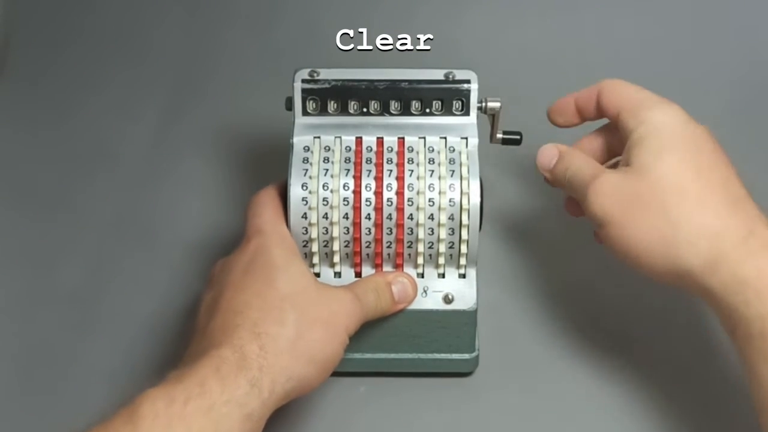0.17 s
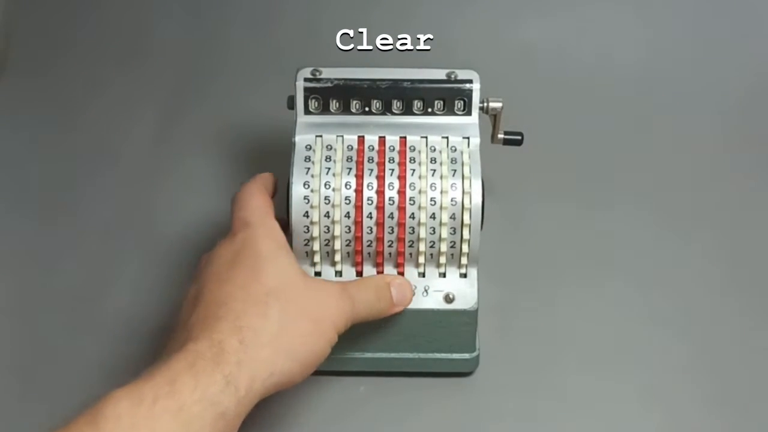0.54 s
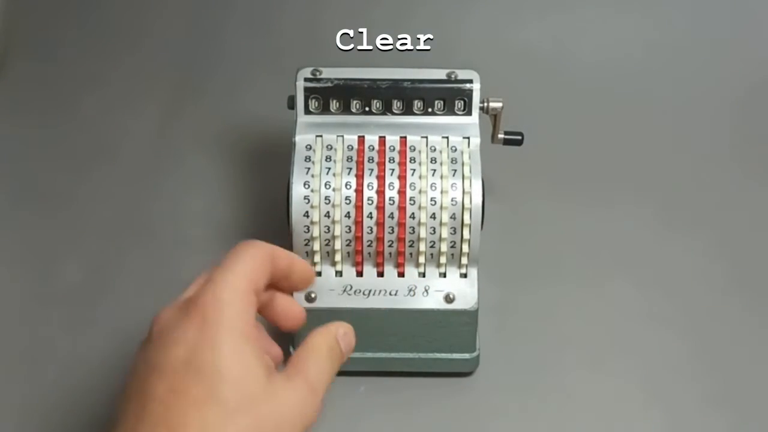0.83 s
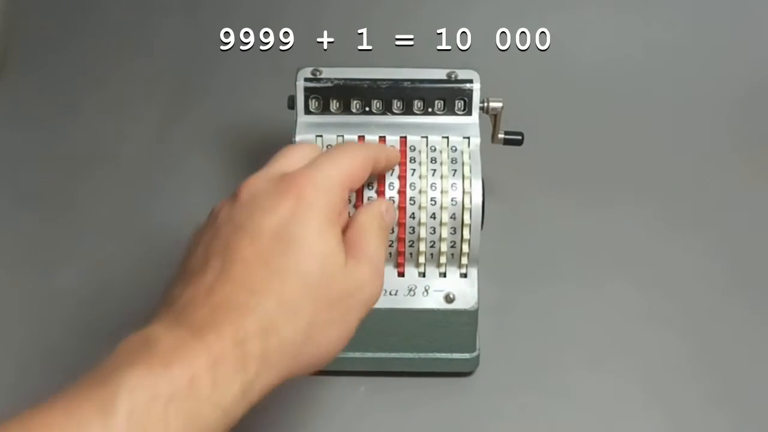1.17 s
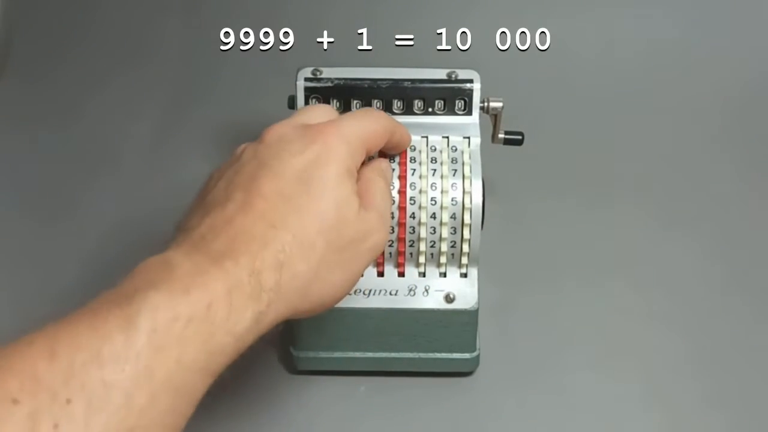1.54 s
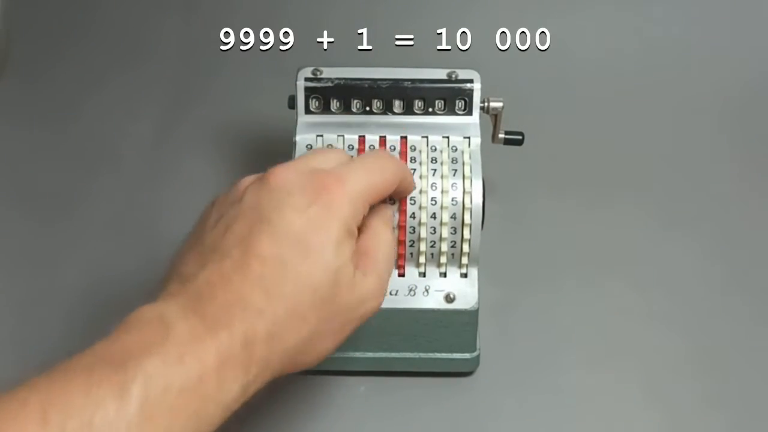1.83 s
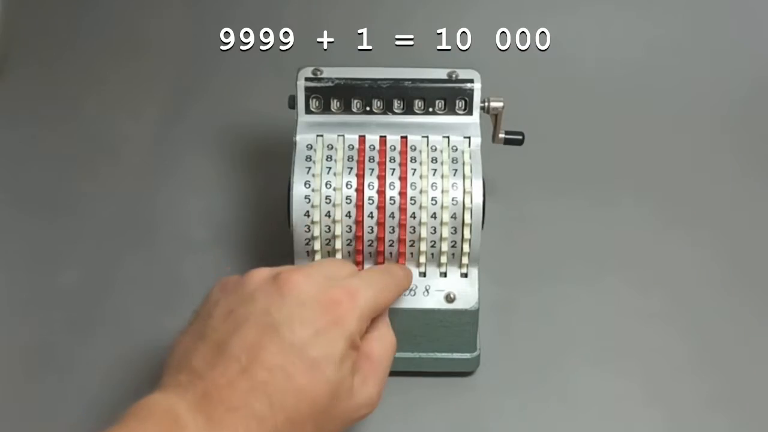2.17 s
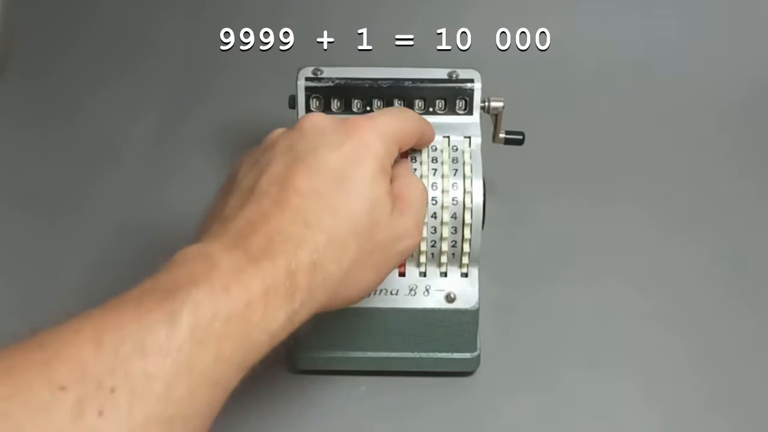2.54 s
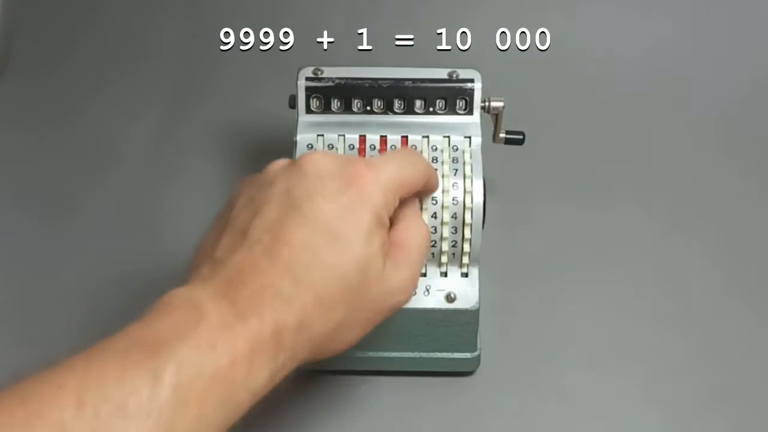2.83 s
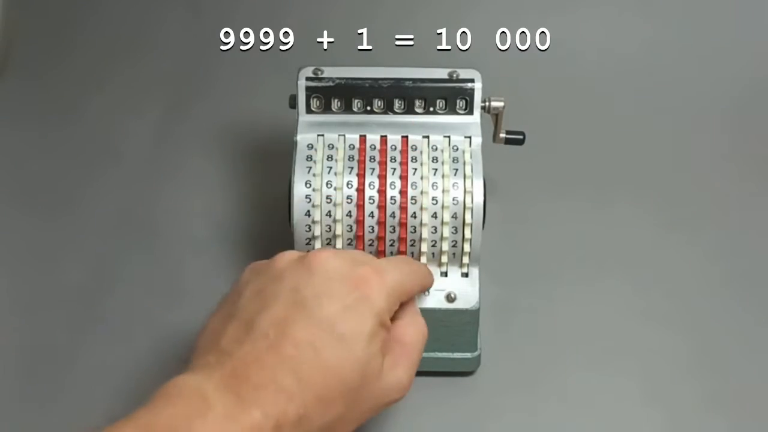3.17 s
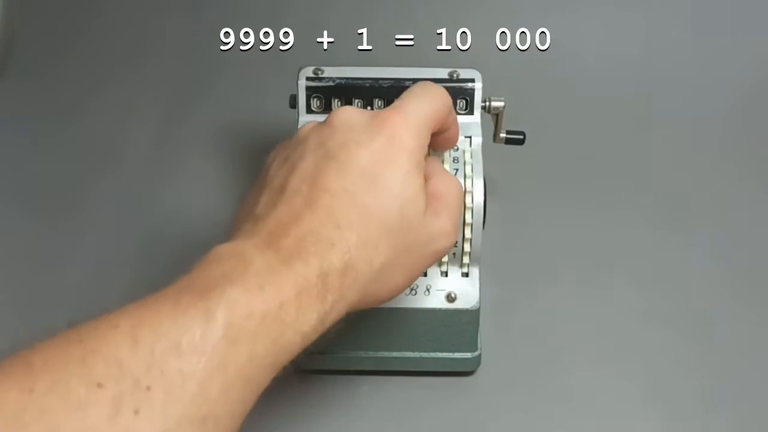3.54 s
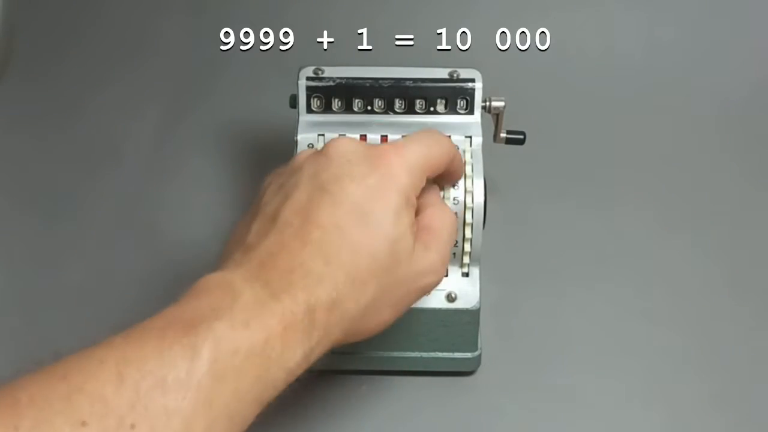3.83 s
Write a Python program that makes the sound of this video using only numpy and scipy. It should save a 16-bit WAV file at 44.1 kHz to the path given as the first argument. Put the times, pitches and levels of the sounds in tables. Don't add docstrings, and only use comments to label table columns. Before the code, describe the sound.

Metal levers ratcheting tooth by tooth on a small mechanical calculator in a quiet room

```python
import sys
import numpy as np
from scipy import signal
from scipy.fft import rfft, irfft
from scipy.io import wavfile
from scipy.ndimage import uniform_filter1d

SR = 44100
rng = np.random.default_rng(int(sys.argv[2]) if len(sys.argv) > 2 else 0)


def makeup_ratio(level_db):
    decades = np.asarray(level_db, float) / 20
    return 10 ** decades


def wrap_up_sound(samples):
    columns = np.atleast_2d(samples).T
    tamed = np.clip(columns, -1, 1)
    steps = np.round(tamed * 32767).astype(np.int16)
    wavfile.write(sys.argv[1], SR, steps)


N = 176400
LEAD = SR // 10


def colour(x, points):
    n, p = x.shape[-1], np.array(points)
    hz = np.maximum(np.arange(n // 2 + 1) * SR / n, 1)
    gain_db = np.interp(np.log(hz), np.log(p[:, 0]), p[:, 1])
    return irfft(rfft(x) * makeup_ratio(gain_db), n)


def unit(x):
    return x / np.sqrt(np.mean(x ** 2))


def band(x, hz, width_hz):
    edges_hz = [hz - width_hz / 2, hz + width_hz / 2]
    return signal.sosfilt(signal.butter(2, edges_hz, "bandpass", fs=SR, output="sos"), x)


def pair(n, like):
    like = np.clip(like, 0, 1)
    mid, side = rng.standard_normal((2, n))
    sign = np.array([[1], [-1]])
    return (np.sqrt(1 + like) * mid + np.sqrt(1 - like) * side * sign) / np.sqrt(2)


def walk(rate_hz, n):
    k = int(SR / rate_hz)
    steps = np.repeat(rng.standard_normal(n // k + 1), k)
    return np.sqrt(2) * uniform_filter1d(uniform_filter1d(steps, k), k)[:n]


def decay(t, t60_s):
    return np.exp(-np.log(1000) * t / t60_s)


def add(out, s, x):
    i = int(s * SR) + LEAD
    out[:, i:i + x.shape[1]] += x[:, :out.shape[1] - i]


def ring(modes, n, scatter_db, detune, channels):
    hz, db, t60_s = np.array(modes).T[:, :, None]
    t = np.arange(n) / SR
    z = rng.standard_normal((channels + 1, len(modes), 1))
    phase = rng.uniform(0, 2 * np.pi, (channels, len(modes), 1)) * (channels - 1)
    wave = np.sin(2 * np.pi * hz * (1 + detune * z[0]) * t + phase)
    out = (makeup_ratio(db + scatter_db * z[1:]) * decay(t, t60_s) * wave).sum(1)
    return out / np.sqrt(np.mean(np.sum(out ** 2, 1)))


def chatter_shape(t, hold_s):
    rise_s, sag_s, fall_s = 0.0038, 0.011, 0.0026
    bounce_s, bounce_db, bounce_fall_s = 0.0125, -14.5, 0.0032
    hold_s = np.clip(hold_s, 0, len(t) / SR / 2)
    falling_s = np.maximum(t - rise_s - hold_s, 0)
    first = np.clip(t / rise_s, 0, 1) * np.exp(-t / sag_s - falling_s / fall_s)
    bounce = np.clip((t - bounce_s) / rise_s, 0, 1)
    bounce = bounce * np.exp(-np.maximum(t - bounce_s - rise_s, 0) / bounce_fall_s)
    return first + makeup_ratio(bounce_db) * bounce


# f/Hz, level/dB, t60/s
CASE_MODES = [(1651, -13.5, 0.018), (1907, -7.5, 0.012), (2756, -13.5, 0.019), (3275, -3.5, 0.016),
              (4156, -15, 0.047), (4500, -5, 0.014), (6440, -6.5, 0.025), (7030, -10, 0.027),
              (7593, -13, 0.031), (7680, -18.5, 0.088), (8160, -11.5, 0.05), (3403, -19.5, 0.0093),
              (7300, -7.5, 0.025)]


def rattle(db, spectrum, hold_s, ring_db, mid_db=0, top_db=0):
    impacts_per_s, spread_db, lump_db, patch_db, like = 28000, 0.43, 0.5, 2.0, 0.5
    n = SR // 20
    shape = chatter_shape(np.arange(n) / SR, hold_s)
    energy = np.sum(shape ** 2)

    struck = rng.random(n) < impacts_per_s / SR
    level_db = spread_db * rng.standard_normal(n) + lump_db * walk(642, n)
    size = struck * makeup_ratio(level_db) * shape
    size = size * np.sqrt(energy / np.sum(size ** 2))

    crack = colour(size * pair(n, like), spectrum)
    patch_hz = 1000 * 2 ** np.arange(0, 4.1, 1 / 3)
    crack = colour(crack, np.c_[patch_hz, patch_db * rng.standard_normal(len(patch_hz))])
    crack = crack / np.sqrt(np.mean(np.sum(crack ** 2, 1)) / energy)

    hits = size * rng.choice([-1, 1], n)
    case = ring(CASE_MODES, 2 * n, 4.5, 0.018, channels=2)
    tone = signal.fftconvolve(hits[None], case, axes=1)[:, :2 * n]

    both = makeup_ratio(ring_db) * tone + np.pad(crack, ((0, 0), (0, n)))
    tilt = [(800, 0.012), (1400, mid_db), (3500, mid_db), (5500, 0.025), (9000, 0.017), (11000, top_db)]
    return makeup_ratio(db) * colour(both, tilt)


def thump(modes, db, push_s):
    push = np.hanning(3 + int(push_s * SR))[None]
    x = signal.fftconvolve(ring(modes, SR // 3, 0.83, 0.014, channels=1), push, axes=1)
    return x / np.abs(x).max() * makeup_ratio(db) * np.ones((2, 1))


# f/Hz, level/dB, t60/s
TABLE_MODES = [(116, 0, .35), (103, -9, .15)]


def table_thump(db, push_s):
    return thump(TABLE_MODES, db, push_s)


# f/Hz, level/dB, t60/s
FRAME_MODES = [(209.7, -15.5, 0.45), (265, -9.5, 0.074), (272.4, -5, 0.2), (300.6, 1.5, 0.16),
               (392, -6.5, 0.15), (441.6, -1, 0.18), (500, -1, 0.21), (544, -10, 0.2), (652, -6.5, 0.31),
               (887, 3, 0.16)]


def frame_knock(db, push_s):
    return thump(FRAME_MODES, db, push_s)


# f/Hz, level/dB
CRANK_COLOUR = [(250, -5), (450, 8.5), (900, -10), (2200, -3.5), (4650, -6.5), (4900, -18), (6500, -8.5),
                (16000, -29.5)]


def crank(air, table):
    s = -0.04
    add(air, s, rattle(-12.5, CRANK_COLOUR, hold_s=0.03, ring_db=-30))
    add(table, s, table_thump(-31, push_s=0.003))
    add(air, s, frame_knock(-41, push_s=0.0005))


# f/Hz, t60/s
ROOM_T60 = [(100, 1), (300, 0.85), (800, 0.82), (2000, 0.62), (5000, 0.57), (8000, 0.49), (14000, .4)]


def room(x):
    level_db, build_s, bass_db = -5.5, 0.0068, 3
    t, echo, p = np.arange(SR) / SR, 0, np.array(ROOM_T60)
    for hz in 80 * 2 ** np.arange(0, 7.7, .5):
        t60_s = np.interp(np.log(hz), np.log(p[:, 0]), p[:, 1])
        like = .2 if hz > 500 else .6
        noise = band(pair(SR, like), hz, hz * 0.31)
        echo = echo + noise * decay(t, t60_s) * makeup_ratio(bass_db * (hz < 300))
    echo = echo * (1 - np.exp(-t / build_s))
    echo = echo / np.sqrt(np.mean(np.sum(echo ** 2, 1)))
    return makeup_ratio(level_db) * signal.fftconvolve(x, echo, axes=1)[:, :x.shape[1]]


# f/Hz, level/dB
AIR_COLOUR = [(30, -22), (110, -6.5), (250, -2.5), (900, -14.5), (1200, -21), (4500, -27), (8000, -27.5),
              (16000, -30)]
# t/s, level/dB
AIR_SETTLE = [(0, 2.5), (.9, 0), (1.5, -2), (2.0, -2), (4, 0.5)]


def room_air():
    noise = pair(N, 0.072)
    side = noise - noise.mean(0)
    noise = unit(colour(noise - colour(side, [(5000, -50.5), (7000, -4.5)]), AIR_COLOUR))
    settle_db = np.interp(np.arange(N) / SR, *np.array(AIR_SETTLE).T)
    return noise * makeup_ratio(-58.5 + settle_db + 0.43 * walk(3.37, N))


def table_hum():
    return unit(band(pair(N, 0.35), 114.9, 13.3)) * makeup_ratio(-58.5 + 3.25 * walk(5.1, N))


# t/s, rumble level/dB, whine level/dB
HAND = [
    (0, -76, -68),
    (.8, -91, -74),
    (1.05, -63, -64.5),
    (1.2, -69, -70.5),
    (1.3, -55, -76),
    (1.72, -54, -85),
    (1.8, -74, -82),
    (4, -53, -88),
]
# f/Hz, level/dB
WHINE = [(3262, -16), (6089, -2), (6223, -1), (6320, -3), (6455, 0), (6573, -1)]


def hand():
    s, rumble_db, whine_db = np.array(HAND).T
    t = np.arange(N) / SR
    rumble = unit(band(pair(N, 0.25), 242, 120))
    rumble = rumble * makeup_ratio(np.interp(t, s, rumble_db) + 1.9 * walk(24.83, N))
    whine = unit(sum(makeup_ratio(db) * band(pair(N, 0.32), hz, 14) for hz, db in WHINE))
    return rumble + whine * makeup_ratio(np.interp(t, s, whine_db))


# t/s, tick level/dB, length/s, table thump level/dB, knock level/dB
TOUCHES = [(.22, -51, 0.01, -39, -52), (0.35, -60, 0.011, -38.5, -62), (0.4894, -47, 0.0022, -38.5, -26.5),
           (0.864, -65, 0.0055, -48, -53), (1.02, -74, .005, -48, -52), (2.717, -47, 0.014, -61, -46.5),
           (2.774, -68, 0.017, -44, -57), (3.26, -40.5, 0.012, -42, -36.5), (3.41, -43, .015, -44, -39),
           (3.493, -42, 0.018, -34, -36.5), (3.6, -72, 0.0087, -41.5, -41.5), (3.748, -75, 0.013, -41, -48),
           (3.784, -52, 0.021, -70, -47)]
# f/Hz, level/dB
FINGER_COLOUR = [(150, -4), (1000, -6.5), (2500, -7), (4300, -14), (5500, -14.5), (6400, -9.5),
                 (8500, -22.5), (16000, -20.5)]
# f/Hz, level/dB, t60/s
BASE_MODES = [(352, 0, .07), (449, 0, .07), (560, -2, .05), (690, -3, .04), (1270, 0, .03)]


def touches(air, solid, table):
    for s, tick_db, length_s, table_db, knock_db in TOUCHES:
        add(air, s, rattle(tick_db, FINGER_COLOUR, length_s, ring_db=-7))
        add(table, s + 0.0025, table_thump(table_db, push_s=0.0093))
        add(solid, s, band(thump(BASE_MODES, knock_db, push_s=0.00066), 950, 1300))


# t/s of first tooth, length/s, level/dB
CREEPS = [
    (1.798, 0.042, -50),
    (2.801, 0.013, -48),
    (3.864, 0.022, -37),
]


def creeps(air):
    for s, length_s, db in CREEPS:
        k = int(length_s * SR)
        scrape = unit(colour(pair(k, 0.5), FINGER_COLOUR))
        add(air, s - length_s, scrape * makeup_ratio(db) * np.linspace(0, 1, k) ** 2)


# t/s, peak level/dB, table thump level/dB, hold/s, mid colour level/dB
TEETH = [(1.8002, -11, -22, 0.021, -0.5), (1.852, -11.5, -25, 0.007, 3), (1.91, -8, -29, 0.011, -1),
         (1.951, -9, -37, .012, 0.5), (1.981, -13, -37, 0.017, 5), (2.0228, -9, -26.5, 0.0092, -1),
         (2.0807, -11.5, -28, 0.0031, 0.5), (2.129, -12.5, -31.5, 0.019, 2), (2.179, -12, -33, 0.011, -1),
         (2.8046, -13, -28, 0.0094, 2.5), (2.858, -15.5, -23, 0.013, 6.5),
         (2.908, -14.5, -28.5, 0.008, 6.5), (2.949, -11, -23.5, 0.011, 0.5), (2.98, -8, -20, 0.0047, -0.5),
         (3.005, -11.5, -20.5, 0.013, 2.5), (3.0327, -10.5, -26, 0.0086, 3), (3.0632, -12, -28, 0.03, -3),
         (3.094, -10, -45, 0.0099, -0.5), (3.8625, -11, -24, 0.0098, 2), (3.8968, -10, -25, 0.012, 1.5),
         (3.937, -14.5, -39, 0.006, 4), (3.9755, -11.5, -49, 0.011, 1.5)]
# f/Hz, level/dB
TOOTH_COLOUR = [(88, -45), (150, -14), (2450, -13), (4320, -7), (5570, -6), (6390, -0.5), (8230, -7),
                (9440, -16), (16000, -4)]


def teeth(air, table):
    for s, db, table_db, hold_s, mid_db in TEETH:
        top_db = 4 * (s > 3.5)
        add(air, s, rattle(db - 3, TOOTH_COLOUR, hold_s, -7, mid_db, top_db))
        add(table, s, table_thump(table_db - 3.5, push_s=0.0055))
        add(air, s, frame_knock(db - 18.5 + mid_db, push_s=0.0013))


# f/Hz, level/dB
SPRING_COLOUR = [(8000, -30), (11500, 0), (16000, 0)]


def spring(air):
    add(air, 3.829, rattle(-49, SPRING_COLOUR, hold_s=0.004, ring_db=-30))


def scene():
    air, solid, table = np.zeros((3, 2, N + LEAD))
    crank(air, table)
    touches(air, solid, table)
    creeps(air)
    teeth(air, table)
    spring(air)
    table_hz, width_hz = 113, 30
    solid = solid + band(band(table, table_hz, width_hz), table_hz, 2 * width_hz)
    echo = room(air + makeup_ratio(-9) * solid)
    return (air + solid + echo)[:, LEAD:] + room_air() + table_hum() + hand()


# f/Hz, level/dB
SIDE_LOSS = [(100, -12), (200, -10.5), (350, -6.5), (700, 0.5), (1500, 0.5), (5000, -.5), (12000, -4.5)]
# f/Hz, level/dB
LEFT_MORE = [(3000, 0.6), (6000, 4), (7500, 3), (8500, -2.5), (12000, -1.5)]
# f/Hz, level/dB
DIP = [(4650, 0), (4950, -7), (5800, -7), (6250, 0)]


def stereo_response(dry):
    mid, side = dry.mean(0), colour((dry[0] - dry[1]) / 2, SIDE_LOSS)
    x = np.array([colour(mid + side, LEFT_MORE), mid - side])
    x = signal.sosfilt(signal.butter(3, 70, "highpass", fs=SR, output="sos"), x)
    x = colour(x, DIP)
    lo_hz, hi_hz, top_hz, lost_db, edge = 8850, 11450, 15800, -60, 1.02
    return colour(x, [(lo_hz / edge, 0), (lo_hz * edge ** 3, lost_db), (hi_hz / edge, lost_db), (hi_hz, 0),
                      (top_hz, 0), (top_hz * (1 + edge) / 2, lost_db), (SR / 2, lost_db)])


# t/s, length/s, level/dB
HISS_BURSTS = [
    (1.806, .02, -63),
    (1.847, 0.023, -60),
    (1.91, 0.019, -65),
    (2.075, 0.023, -66),
    (2.122, 0.017, -47),
    (2.796, 0.038, -51),
    (2.95, 0.031, -50),
    (3.847, 0.017, -46),
    (3.964, 0.026, -45),
]


def faint_noise(dry):
    duck_db, hiss_db, sub_db, sub_loud_db = -72, -80, -93, -80
    loud = colour(dry.mean(0), [(2000, -29), (4000, -15.5)])
    power = uniform_filter1d(loud ** 2, SR // 30)
    quiet_share = 1 / (1 + power / makeup_ratio(duck_db) ** 2)
    t = np.arange(N) / SR
    gates = sum(makeup_ratio(db) * ((t > s) & (t < s + length_s)) for s, length_s, db in HISS_BURSTS)
    burst = uniform_filter1d(gates, SR // 200)
    hiss = (makeup_ratio(hiss_db) * quiet_share + burst) * band(pair(N, 1.0), 10100, 2600)
    sub_gain = makeup_ratio(sub_db) + makeup_ratio(sub_loud_db) * (1 - quiet_share)
    return hiss + sub_gain * unit(band(pair(N, .6), 50, 60))


def low_pass(x):
    return signal.sosfilt(signal.butter(12, 17020, fs=SR, output="sos"), x)


def record(dry):
    mix = stereo_response(dry) + faint_noise(dry)
    return low_pass(mix)


dry = scene()
out = record(dry)
wrap_up_sound(out)
```